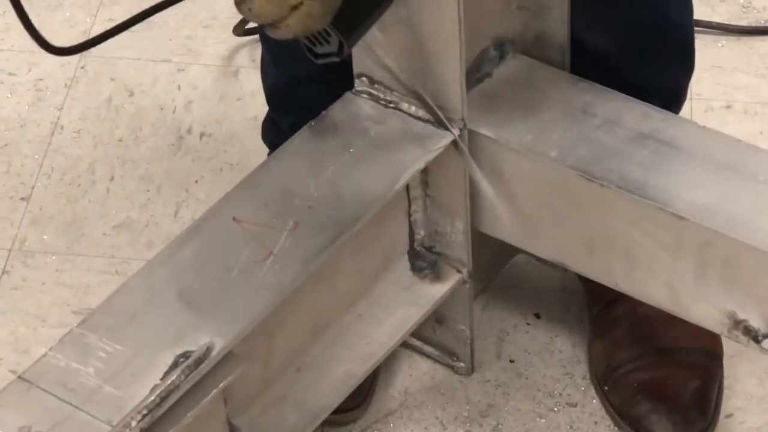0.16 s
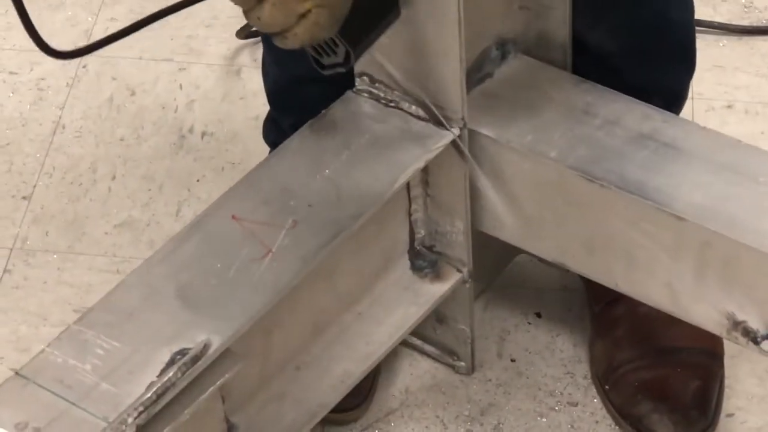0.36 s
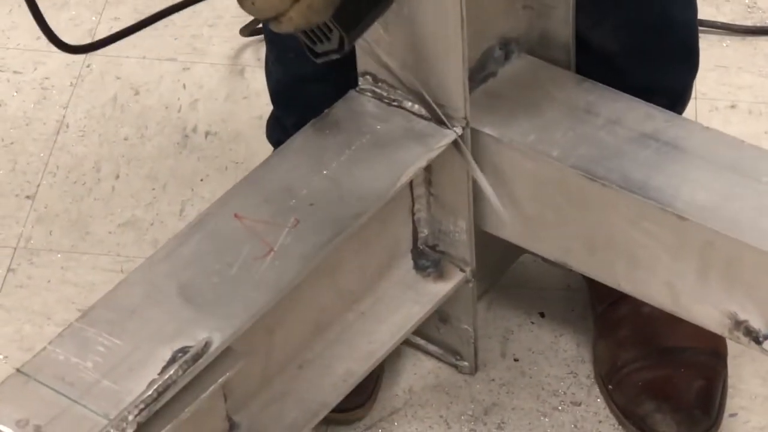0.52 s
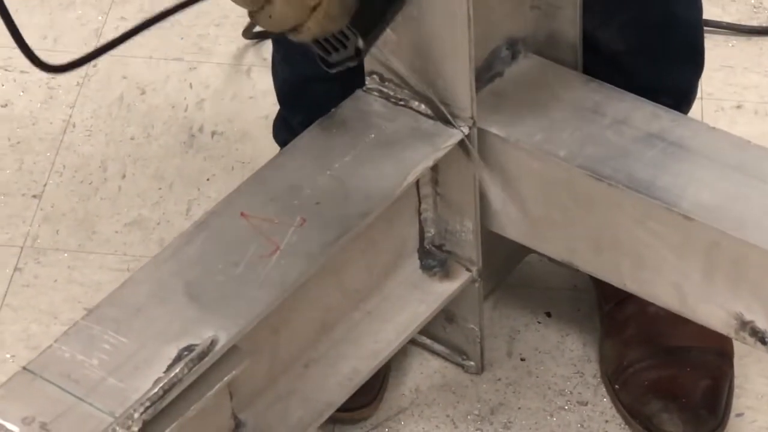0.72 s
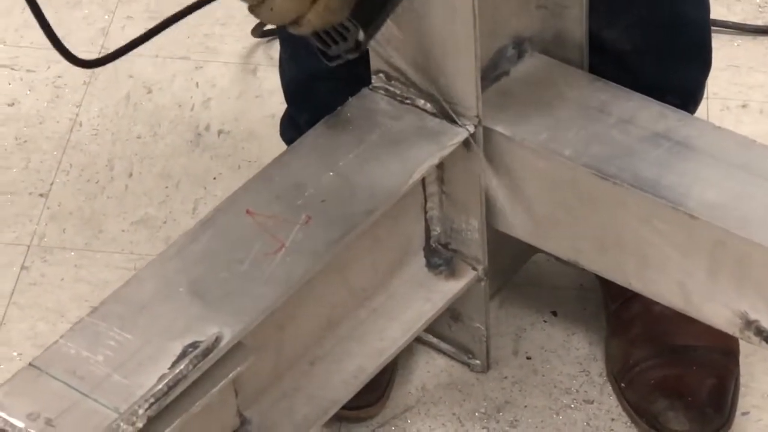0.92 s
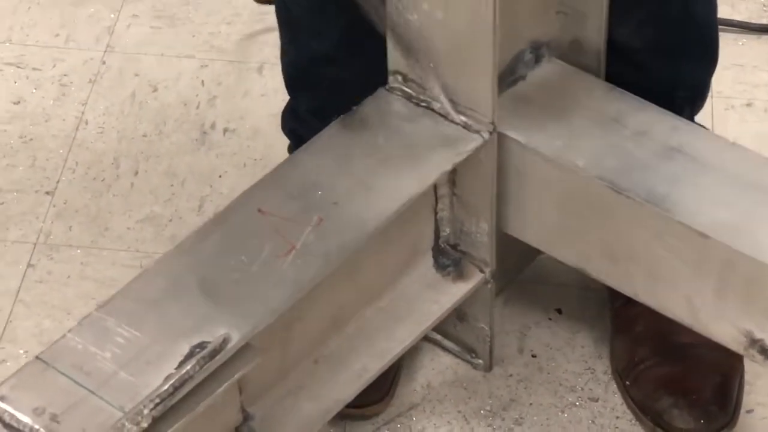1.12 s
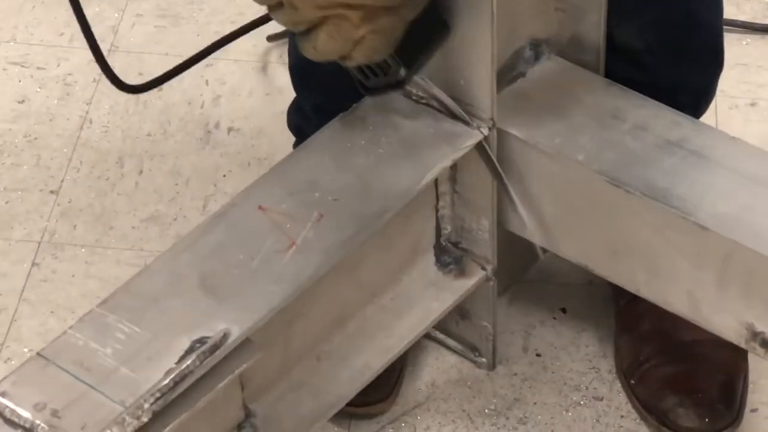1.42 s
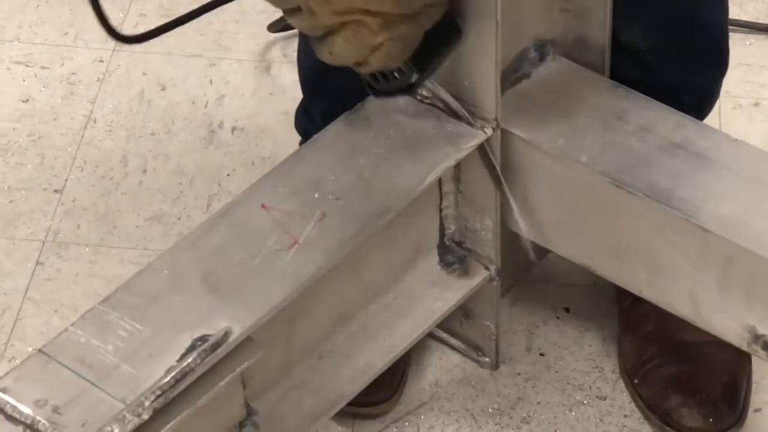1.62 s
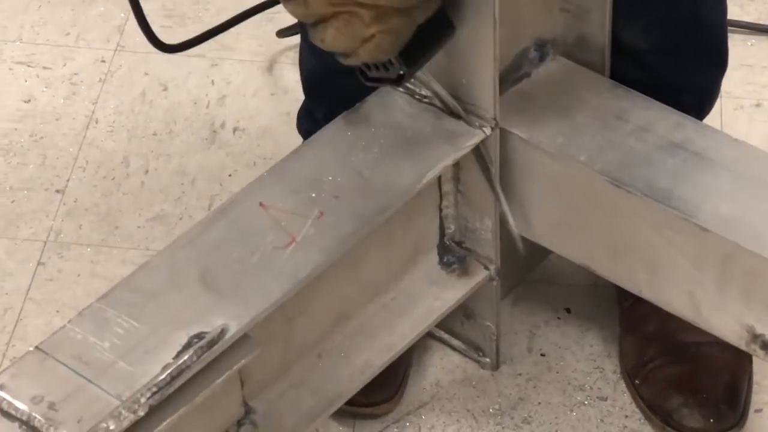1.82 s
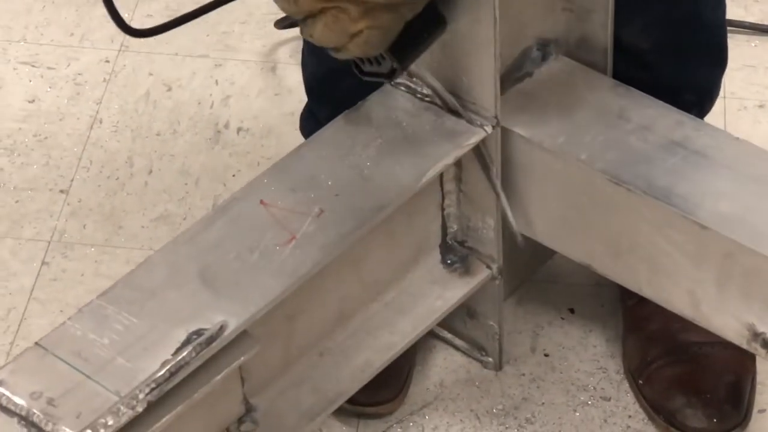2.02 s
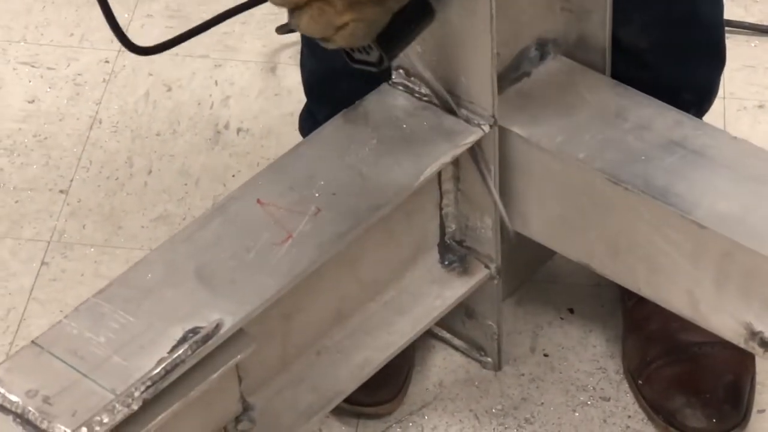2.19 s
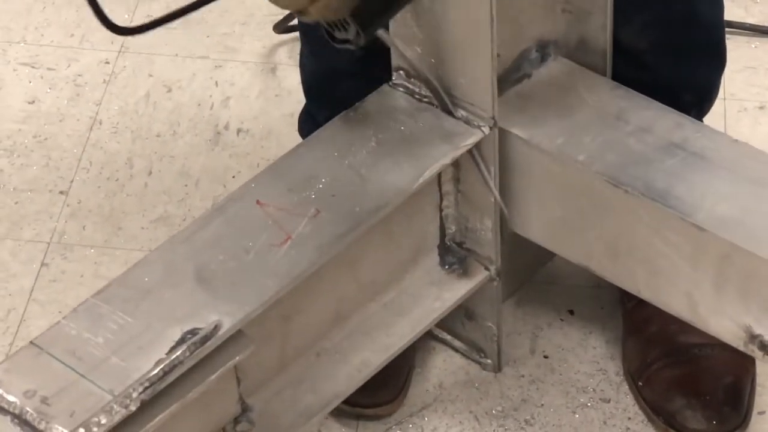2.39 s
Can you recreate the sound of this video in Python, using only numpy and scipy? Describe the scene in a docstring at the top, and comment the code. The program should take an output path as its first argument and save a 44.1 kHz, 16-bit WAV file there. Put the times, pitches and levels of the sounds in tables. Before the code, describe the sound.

A reciprocating saw cuts an aluminium frame close by in a workshop: a fast, harsh rasp with ringing clatter, short squeals and a faint motor hum. At about 1 second it slows and bumps dully, then skims the cut more quietly from 1.2 to 1.5 seconds. It pushes back in with another shudder and rasps on, with thin squeaks, until about 2.5 seconds.

```python
"""A harsh, fast rasp over ringing metal: a reciprocating saw cuts a welded aluminium frame in a workshop.
Teeth scrape on every stroke, about 41 a second, and the blade knocks at each reversal.
The frame clatters and squeals where the blade binds, over the hum of the drive.
After a second the saw is drawn back: it shudders, slows and skims the cut, then is pushed in again."""
import sys
import numpy as np
from scipy import signal
from scipy.fft import rfft, irfft, next_fast_len
from scipy.io import wavfile
from scipy.ndimage import uniform_filter1d

SR = 44100
rng = np.random.default_rng(int(sys.argv[2]) if len(sys.argv) > 2 else 0)


def digitize_waveform(pressure):
    """Quantize a signal to 16-bit integers and store it at the path in sys.argv[1].

    Rows of a 2-D input are taken as channels; values are limited to [-1, 1].
    """
    field = np.atleast_2d(pressure).T
    bounded = np.clip(field, -1, 1)
    quanta = np.round(bounded * 32767).astype(np.int16)
    wavfile.write(sys.argv[1], SR, quanta)


N = 112454
TIME_S = np.arange(N) / SR


def undb(db):
    """Decibels to gain."""
    return 10 ** (np.asarray(db) / 20)


def unit(x):
    """Scale to rms 1."""
    return x / np.sqrt(np.mean(x ** 2))


def curve(table, column=1):
    """Automation: one column of a table, joined by straight lines in time."""
    rows = np.array(table)
    return np.interp(TIME_S, rows[:, 0], rows[:, column])


def walk(rate_hz):
    """Smooth random wander of rms 1."""
    hold = max(int(SR / rate_hz), 1)
    steps = np.repeat(rng.standard_normal(N // hold + 1), hold)
    return unit(uniform_filter1d(steps, hold)[:N])


def swell(start_s, length_s):
    """A rounded rise and fall."""
    return np.sin(np.pi * np.clip((TIME_S - start_s) / length_s, 0, 1))


def tone(hz):
    """A sine of rms 1 that follows a pitch curve."""
    return np.sqrt(2) * np.sin(2 * np.pi * (np.cumsum(hz) / SR + rng.random()))


def lowpass(x, hz):
    """Gentle low-pass without delay."""
    return signal.sosfiltfilt(signal.butter(2, hz, fs=SR, output="sos"), x)


def colour(x, eq):
    """Shape with an EQ curve of (freq_hz, gain_db) points; rms 1."""
    hz, db = np.array(eq).T
    size = next_fast_len(N + SR // 20, real=True)
    freqs = np.fft.rfftfreq(size, 1 / SR)
    gain = undb(np.interp(np.log(freqs + 1), np.log(hz), db))
    return unit(irfft(rfft(x, size) * gain, size)[:N])


def resonate(x, eq, modes):
    """Ring through a broad EQ curve plus narrow resonant peaks; rms 1."""
    size = 16384
    freqs = np.fft.rfftfreq(size, 1 / SR)
    hz, db = np.array(eq).T
    broad_db = np.interp(np.log(freqs + 1), np.log(hz), db)
    peaks_db = sum(height / (1 + (2 * (freqs - centre) / width) ** 2) for centre, width, height in modes)
    # minimum phase: the ring follows the hit
    cepstrum = irfft(np.log(undb(broad_db + peaks_db)))[:size // 2]
    response = irfft(np.exp(rfft(2 * cepstrum, size)))[:size // 2]
    return unit(signal.fftconvolve(x, response)[:N])


def tail(x, t60_s, wet_db, top_hz):
    """Add a dense, duller decaying tail at about unchanged power."""
    t = np.arange(SR // 2) / SR
    response = rng.standard_normal(len(t)) * np.exp(-np.log(1000) * t / t60_s)
    wet = signal.fftconvolve(x, lowpass(response / np.linalg.norm(response), top_hz))[:N]
    return (x + undb(wet_db) * wet) / np.hypot(1, undb(wet_db))


def blade_shift(early, late, centre_s=1.32, fade_s=0.98):
    """Crossfade from early to late as the blade shifts in the cut."""
    return early + (late - early) * np.clip((TIME_S - centre_s) / fade_s + .5, 0, 1)


def metal(push, eq, modes):
    """A metal part rings; its colour and modes change weight as the blade shifts."""
    eq, modes = np.array(eq), np.array(modes)
    early = resonate(push, eq[:, [0, 1]], modes[:, [0, 1, 2]])
    late = resonate(push, eq[:, [0, 2]], modes[:, [0, 1, 3]])
    return blade_shift(early, late)


def drive(stroke_hz):
    """The crank's reversals make a wavering hum, with brief whines and a drone above it."""
    # hum partials: multiple_of_reversal_rate, early_db, late_db
    harmonics = [(1,-99,-94.5), (2,-91,-93.5), (3,-84.5,-77), (4,-86.5,-81.5), (6,-76,-86), (7,-83,-71.5),
                 (8,-75,-71)]
    # harmonics that swell under load: start_s, length_s, multiple_of_stroke_rate, level_db
    load_whines = [(0,.14,20,-63.5), (.18,0.1,20,-64), (0.277,0.16,22,-66), (1.624,0.081,14,-61.5),
                   (1.733,0.082,16,-65), (1.88,0.18,16,-60.5), (1.97,0.107,14,-60)]
    # fader of the drone: time_s, level_db
    drone_fader = [(0,-66.5), (.11,-65), (.2,-78), (.28,-72), (.55,-87.5), (.73,-66), (.84,-81),
                   (.97,-66.5), (1.3,-94), (1.55,-75.5), (1.98,-82), (2.14,-62), (2.3,-71), (2.39,-64.5),
                   (2.55,-67)]
    skim_db = -13 * np.exp(-((TIME_S - 1.19) / 0.19) ** 2)  # the hum sinks while the blade only skims
    hum = 0
    for multiple, early_db, late_db in harmonics:
        gain = undb(blade_shift(early_db, late_db) + skim_db + 3 * walk(16))
        hum += gain * tone(2 * multiple * stroke_hz * (1 + 0.01195 * walk(60.1)))
    whines = sum(undb(db) * swell(start, length) * tone(multiple * stroke_hz)
                 for start, length, multiple, db in load_whines)
    return hum + whines + undb(curve(drone_fader)) * tone(10 * stroke_hz)


def shudders(strokes):
    """The loose saw bumps against the work: dull knocks and grit that swell and die away."""
    # drawing back, then pushing in: start_s, rise_s, length_s, level_db
    bumps = [(1.045, 0.016, 0.2, -53.5), (1.443, 0.1, 0.21, -60.5)]
    # dull body of the bumps: freq_hz, gain_db
    bump_eq = [(25,-35), (95,-20), (145,-7), (190,-5), (280,-0.5), (560,5.5), (1100,-8.5), (2000,-25)]
    envelope = sum(undb(db) * np.interp(TIME_S, [start, start + rise, start + length], [0, 1, 0])
                   for start, rise, length, db in bumps)
    return envelope * colour(knocks(strokes) + teeth(strokes), bump_eq)


def squeals(flutter_db=1.0):
    """Blade and frame bind: short, unsteady stick-slip tones."""
    # each squeal: start_s, length_s, pitch_hz, level_db, waver_hz
    binds = [(0.07,0.1,2743,-44,23), (0.095,0.1,2960,-49,21), (0.57,0.08,2760,-48,23),
             (0.927,0.079,2754,-47,18), (1.022,.095,2783,-48,26), (.37,.13,1169,-55.5,25),
             (0.497,0.12,1190,-54,23.4), (0.622,.075,1182,-58,19), (0.752,0.22,1191,-53,28),
             (0.907,0.13,1194,-51.5,25), (1.553,.09,1190,-57,25), (1.76,0.21,1200,-60,23),
             (1.94,0.12,1187,-55,24), (2.35,.115,1185,-55,23), (1.14,0.15,8700,-53,350),
             (1.311,0.047,8520,-54,210), (1.68,.05,12900,-55,100), (1.872,.07,12730,-55,110),
             (1.93,0.12,9770,-52,87), (2.07,0.11,12710,-53,100)]
    return sum(undb(db + flutter_db * walk(160)) * swell(start, length) * tone(hz + waver * walk(700))
               for start, length, hz, db, waver in binds)


def teeth(strokes, scatter_db=2):
    """Chips torn off by the teeth: clicks that crowd together as the blade moves faster."""
    rubbing = .35 + np.abs(np.sin(2 * np.pi * strokes))  # some rubbing goes on at the reversals
    chips_per_s = 9000 * rubbing
    clicks = (rng.random(N) < chips_per_s / SR) * rng.choice([-1, 1], N)
    return unit(clicks * undb(scatter_db * rng.standard_normal(N)))


def knocks(strokes, decay_s=0.0018, scatter_db=1, rebound_db=-3.5):
    """The blade slaps the cut at each reversal and rebounds half way to the next."""
    quarters = 4 * strokes
    slap = quarters.astype(int)
    age_s = (quarters - slap) / (np.gradient(quarters) * SR)
    strength = undb(scatter_db * rng.standard_normal(N)[slap] + rebound_db * (slap % 2))
    return unit(strength * np.exp(-age_s / decay_s) * rng.standard_normal(N))


def snags(per_s=98, decay_s=0.018):
    """Small random catches of the teeth: the grip jumps and relaxes; spread 1."""
    catches = 1. * (rng.random(N) < per_s / SR)
    grip = signal.lfilter([1], [1, -np.exp(-1 / (decay_s * SR))], catches)
    return unit(grip - grip.mean())


def bites():
    """The teeth catch hard: jumps of rasp and clatter in dB, dying as the chip clears."""
    # sudden scrapes: start_s, decay_s, rasp_jump_db, clatter_jump_db
    scrapes = [(0.203,0.023,4.5,1), (.4554,0.018,4.5,-1), (.521,0.038,3.5,4.5), (0.769,0.015,5,-1.5),
               (0.8352,0.032,7,0), (1.031,.025,4.5,6.5), (1.1413,0.02,6.5,-4), (1.2376,0.024,10,0),
               (1.3209,0.028,4,3.5), (1.4471,.02,4.5,3.5), (1.486,0.025,3.5,0.5), (1.533,0.035,1,2.5),
               (1.872,.02,2.5,2), (2.079,0.012,1,3), (2.1196,0.019,2.5,1.5), (2.2144,.02,1.5,0)]
    return sum(np.outer([rasp, clatter], (TIME_S >= start) * np.exp(-np.abs(TIME_S - start) / decay))
               for start, decay, rasp, clatter in scrapes)


def cutting(strokes):
    """Teeth and knocks excite the blade (bright rasp) and the frame (clatter, rumble)."""
    # resonances of blade and frame: pitch_hz, width_hz, early_height_db, late_height_db
    blade_modes = [(4600,150,3.5,3), (4970,32,6,4), (5420,110,4,8.5), (5784,36,3,1.5), (5760,150,5,4.5),
                   (6550,38,-10,6), (7370,106,9,2), (8060,70,3,5), (8640,70,4,7), (8500,69,4.5,-1),
                   (8850,89,2.5,3), (9310,73,0,7.5), (9900,79,-6,7.5), (10930,220,5,-5), (11500,88,6,4.5),
                   (11550,180,1,10), (12100,71,2,-2), (12700,93,-6,12.5), (14900,90,3,2)]
    frame_modes = [(1197,40,8,4.5), (1367,21,1,7.5), (1530,14,-3.5,9.5), (1650,61,3.5,1), (1815,37,1,2),
                   (2003,51,2,0), (2105,29,4.5,0), (2346,86,5.5,6), (2730,91,4.5,2), (2860,60,0,-1),
                   (3060,46,5.5,0), (3130,53,6,6.5), (3340,62,5,0), (3517,39,4,6), (3691,44,6.5,2),
                   (3800,170,6,12.5)]
    # broad tone of blade and frame: freq_hz, early_gain_db, late_gain_db
    rasp_eq = [(1420,-40,-35), (3470,-6.5,-4), (4400,0.5,-1), (5600,-3,-5.5), (7430,-6.5,-7.5),
               (9050,0.5,-3), (10100,-6,-5.5), (10800,-7.5,-9), (12300,-5.5,-9), (13000,-11,-11),
               (15800,-13.5,-8.5)]
    clatter_eq = [(384,-45,-44), (1013,-18,-11.5), (1500,-9,-7.5), (1865,-1,-4), (2360,-2,-0.5),
                  (2530,-3,-4), (2700,-2.5,-3.5), (3370,-5,-4.5), (4050,-13,-14), (7450,-24.5,-23.5)]
    # low body of the frame: freq_hz, gain_db
    rumble_eq = [(25,-46), (55,-55), (100,-23), (150,-15), (200,-18.5), (280,-5.5), (560,3), (720,-1),
                 (900,5), (1500,-9), (2500,-17)]
    # faders of the cut, ahead of bites and trims: time_s, rasp_db, clatter_db
    cut_faders = [(0,-41,-39), (.06,-41,-38.5), (.13,-42.5,-41), (.19,-45,-41.5), (.33,-45,-43.5),
                  (.40,-42,-40), (.445,-47,-43.5), (.51,-48,-45.5), (.56,-47,-47), (.69,-48,-45.5),
                  (.79,-45,-41.5), (.825,-49,-46), (.86,-47,-42), (.90,-46.5,-44.5), (.96,-46,-43),
                  (1.02,-48,-48.5), (1.06,-46,-45.5), (1.125,-50,-46.5), (1.19,-48,-44), (1.23,-54.5,-49.5),
                  (1.305,-57.5,-56.5), (1.33,-55.5,-51), (1.43,-53.5,-52.5), (1.48,-49.5,-50.5),
                  (1.55,-45.5,-45), (1.6,-44.5,-45.5), (1.66,-45.5,-45.5), (1.85,-46.5,-45.5),
                  (1.88,-48.5,-44), (1.91,-46,-45.5), (1.99,-43.5,-44), (2.03,-45.5,-43.5),
                  (2.08,-43.5,-43.5), (2.2,-45.5,-44.5), (2.39,-44.5,-43.5), (2.45,-48,-45.5),
                  (2.55,-46.5,-44.5)]
    # fader of the rumble, ahead of its trim: time_s, level_db
    rumble_fader = [(0,-60.5), (.2,-68), (.54,-62.5), (.66,-76), (.76,-62.5), (1.0,-67.5), (1.2,-59.5),
                    (1.3,-69.5), (1.55,-63), (1.85,-65.5), (2.0,-60.5), (2.3,-60.5), (2.55,-67)]
    # high shelf on the rasp: time_s, gain_db
    sizzle_shelf = [(0,-9), (.2,-1.5), (.45,3), (.85,-0.5), (1.04,-0.5), (1.12,-8), (1.17,-1), (1.3,-3.5),
                    (1.6,-4), (1.8,-0.5), (2.1,-1), (2.5,1.5)]
    rasp_trim_db, clatter_trim_db, rumble_trim_db = 1, 0.97, 3.5
    plate_ring = dict(t60_s=0.058, wet_db=-6.5, top_hz=14000)

    chips, slaps, grip = teeth(strokes), knocks(strokes), snags()
    rasp_jump_db, clatter_jump_db = bites()
    on_blade = tail((chips + undb(-5.5) * slaps) * undb(0.5 * grip), **plate_ring)
    on_frame = tail((chips + undb(-7.5) * slaps) * undb(-0.04 * grip), **plate_ring)
    rasp = metal(on_blade, rasp_eq, blade_modes)
    sizzle = rasp - lowpass(rasp, hz=9800)
    rasp += (undb(curve(sizzle_shelf)) - 1) * sizzle
    rasp *= undb(curve(cut_faders, column=1) + rasp_jump_db + rasp_trim_db)
    clatter = metal(on_frame, clatter_eq, frame_modes)
    clatter *= undb(curve(cut_faders, column=2) + clatter_jump_db + clatter_trim_db)
    rumble = colour(teeth(strokes), rumble_eq) * undb(curve(rumble_fader) + rumble_trim_db)
    return rasp + clatter + rumble


def scene():
    """The cut echoes in the workshop over the dry hum of the drive."""
    # pace of the saw, sagging as it is drawn back: time_s, strokes_per_s
    pace = [(0, 41.8), (.15, 41.8), (.45, 40.8), (.68, 41.9), (.8, 40.6), (1.0, 40.0), (1.12, 36.0),
            (1.5, 36.5), (1.65, 38.3), (1.8, 40.0), (2.0, 41.0), (2.15, 40.6), (2.55, 40.9)]
    stroke_hz = curve(pace) * (1 + .005 * walk(30))
    strokes = np.cumsum(stroke_hz) / SR
    saw = cutting(strokes) + shudders(strokes) + squeals()
    in_workshop = tail(saw, t60_s=0.59, wet_db=-9.5, top_hz=6050)
    return (in_workshop + drive(stroke_hz))[None]


def record(dry, top_hz=15800):
    """A steep low-pass takes off the highest treble."""
    return signal.sosfilt(signal.ellip(12, .2, 70, top_hz, fs=SR, output="sos"), dry)


dry = scene()
out = record(dry)
digitize_waveform(out)
```